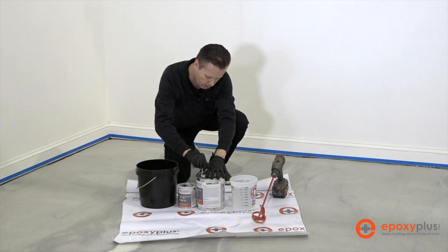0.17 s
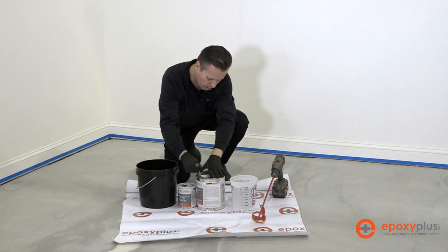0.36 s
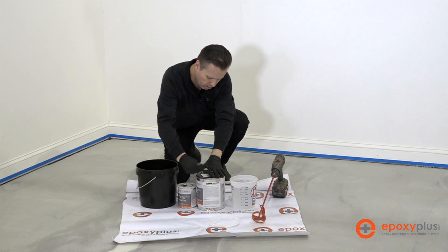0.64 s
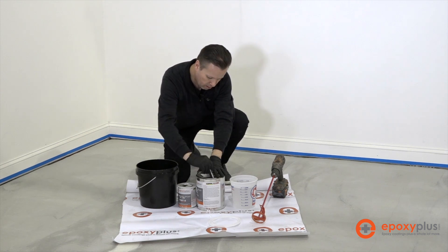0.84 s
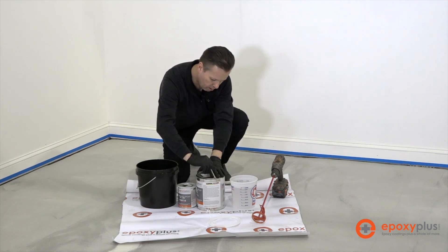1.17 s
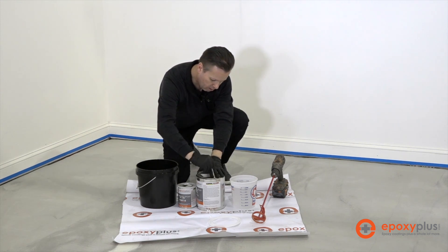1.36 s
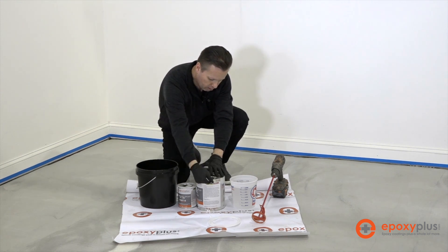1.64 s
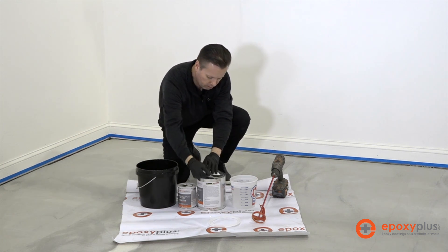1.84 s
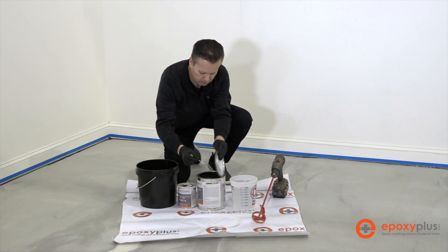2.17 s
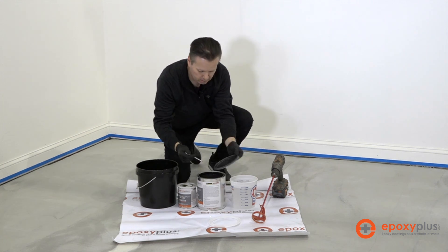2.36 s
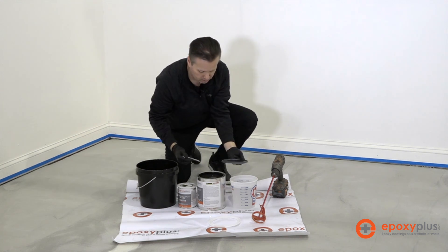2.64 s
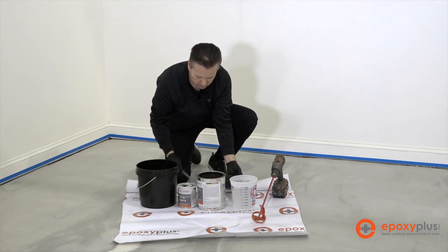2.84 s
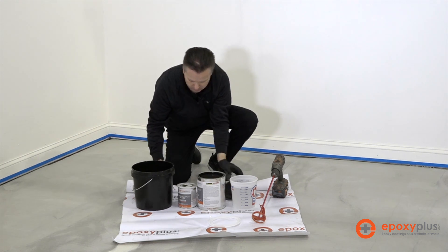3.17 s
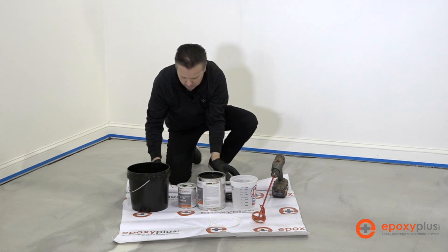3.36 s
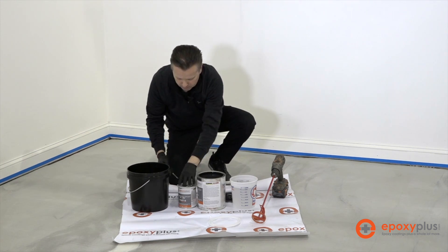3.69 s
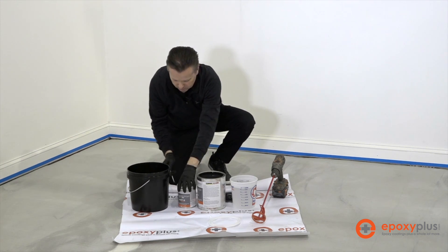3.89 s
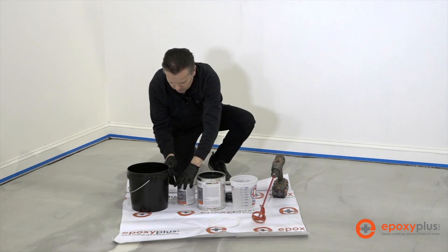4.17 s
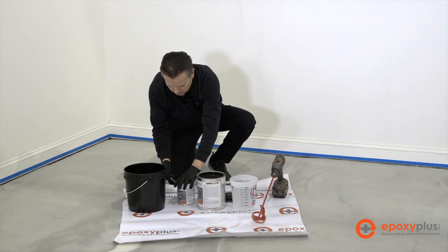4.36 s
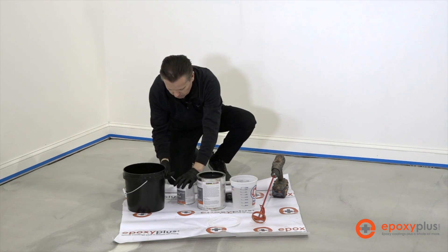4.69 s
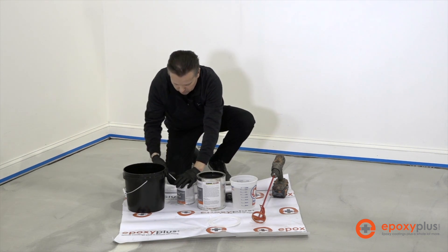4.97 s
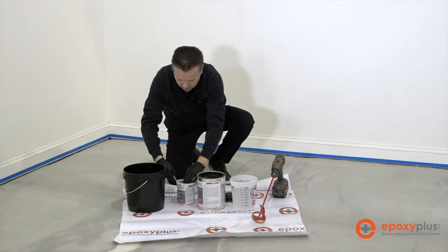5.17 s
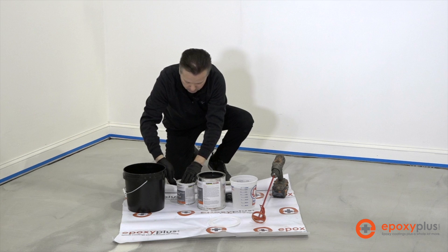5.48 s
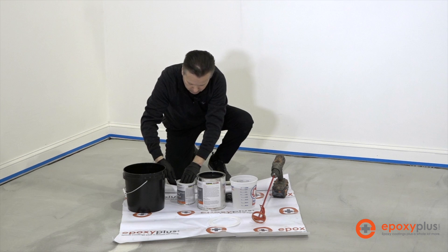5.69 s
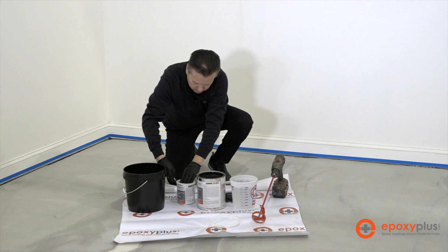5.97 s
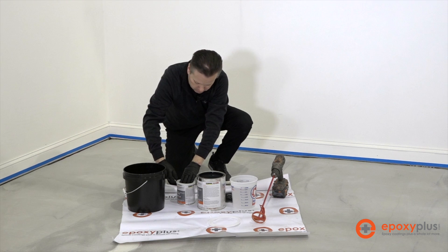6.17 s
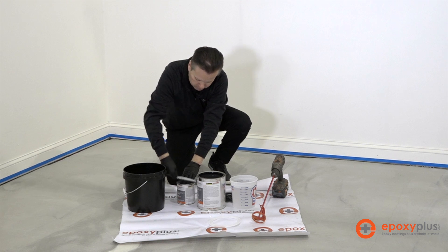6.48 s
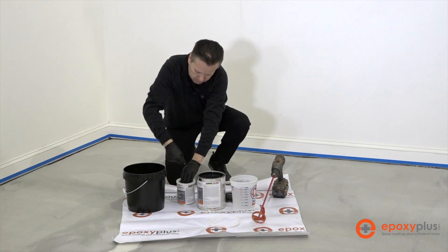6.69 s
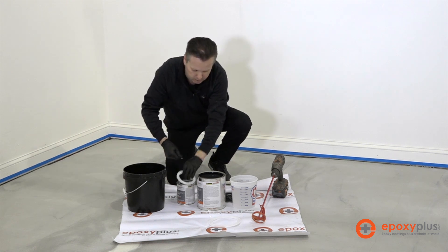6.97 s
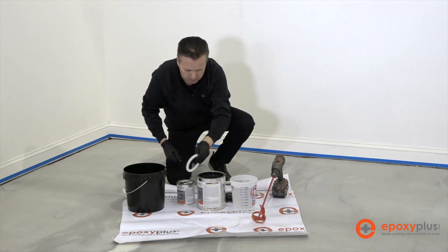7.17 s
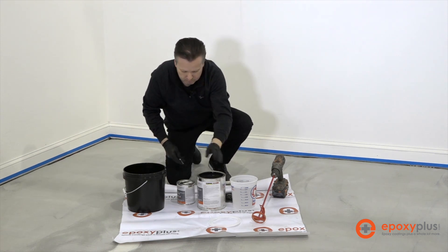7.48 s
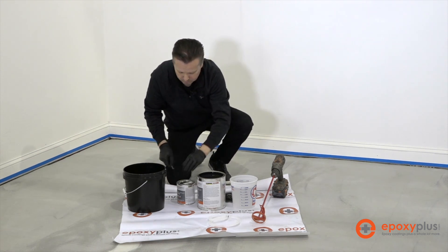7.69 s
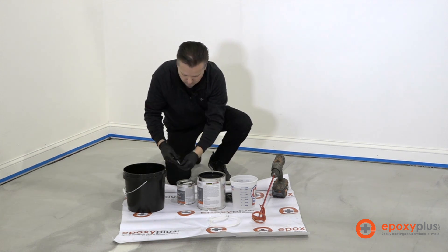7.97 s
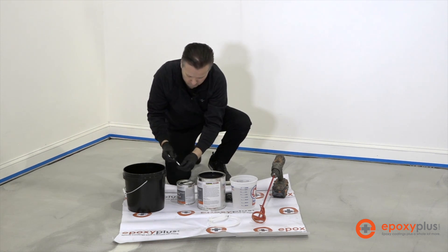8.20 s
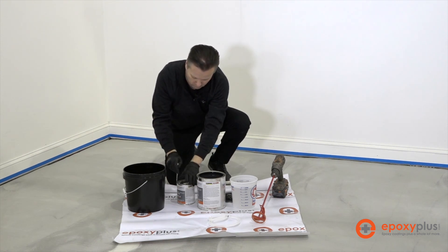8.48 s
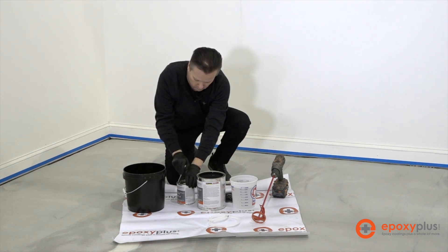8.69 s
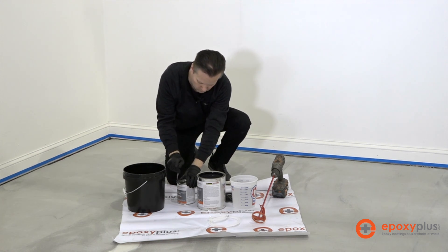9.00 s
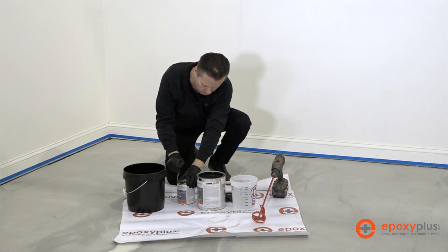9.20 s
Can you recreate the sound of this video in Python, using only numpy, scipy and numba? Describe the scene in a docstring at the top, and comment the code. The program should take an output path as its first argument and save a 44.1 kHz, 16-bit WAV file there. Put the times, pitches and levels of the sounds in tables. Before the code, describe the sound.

A tool clicks and drums on a large tin until its lid pops loudly, then quieter prying frees a small tin's lid among plastic rustles.

```python
"""In a quiet, faintly humming hard room, someone kneeling near a microphone levers at a large paint can.
The tool clicks on the rim and the can drums, each blow a burst of contact ringing tuned modes, while two echoes
and a diffuse tail answer. Cans and gloves rub on a plastic sheet in strokes of grainy noise, and gliding
resonances creak. The large lid pops and rings at 2 s; knocks and prying on a small can follow, whose lid pops
at 7.6 s. Small knocks and rubs follow to the end."""
import sys
import numpy as np
from scipy import signal
from scipy.fft import rfft, irfft, next_fast_len
from scipy.io import wavfile
from scipy.ndimage import uniform_filter1d
from numba import njit

SR = 44100
rng = np.random.default_rng(int(sys.argv[2]) if len(sys.argv) > 2 else 0)


def generate_wav(sig):
    """Save sig (samples, or channels by samples) to the path in sys.argv[1] as 16-bit PCM at SR."""
    pcm = np.round(np.clip(np.atleast_2d(sig).T, -1, 1) * 32767).astype(np.int16)
    wavfile.write(sys.argv[1], SR, pcm)


N = 411894


def undb(db):
    """Turn decibels into an amplitude factor."""
    return 10 ** (np.asarray(db) / 20)


def level(x, db):
    """Set the RMS level in dB."""
    return x * undb(db) / np.sqrt(np.mean(x ** 2))


def colour(x, points):
    """Shape the spectrum by (f/Hz, level/dB) points and bring the result to unit RMS."""
    size = next_fast_len(len(x))
    hz, db = np.transpose(points)
    bin_hz = np.arange(size // 2 + 1) * SR / size
    gain = undb(np.interp(np.log(bin_hz + 1), np.log(hz), db))
    return level(irfft(rfft(x, size) * gain, size)[:len(x)], 0)


def band(x, lo_hz, hi_hz):
    """Keep one frequency band, with gentle slopes."""
    return signal.sosfilt(signal.butter(2, [lo_hz, hi_hz], "band", fs=SR, output="sos"), x)


def walk(rate):
    """Random levels held 1 / rate s and slewed twice; spread near 1."""
    hold = int(SR / rate)
    steps = np.repeat(rng.standard_normal(N // hold + 1), hold)
    return 1.3 * uniform_filter1d(uniform_filter1d(steps, hold), hold)[:N]


@njit
def svf(x, hz, sharp):
    """State-variable band-pass with a moving centre; sharp is its Q."""
    y, b, l = np.empty(len(x)), 0., 0.  # output, band state, low state
    for i in range(len(x)):
        g = np.tan(np.pi * hz[i] / SR)
        v = (b + g * (x[i] - l)) / (1 + g * (g + 1 / sharp))
        b, l, y[i] = 2 * v - b, l + 2 * g * v, v / sharp
    return y


def even(x, shape):
    """Keep the timing of a burst but level its spectrum, so that no pitch is favoured."""
    spectrum = rfft(x * shape, 2 * len(x))
    flat = irfft(spectrum / (np.abs(spectrum) + 1e-12))[:len(x)]
    return flat * np.sqrt(shape)


def radiate(x, low_hz=190):
    """Cans and lids radiate deep bass only weakly."""
    return signal.sosfilt(signal.butter(1, low_hz, "high", fs=SR, output="sos"), x)


# Spectrum of the empty room and the microphone: (f/Hz, relative level/dB per Hz)
QUIET_SPECTRUM = [(12, -46.5), (20, 3), (64, -2.5), (113, 0), (326, -14.5), (449, -13.5), (920, -20.5),
                  (1840, -26.5), (2270, -24), (2460, -23.5), (3210, -25.5), (10300, -27.5), (11500, -31.5),
                  (15000, -73), (22000, -120)]
QUIET_DB = -61.5
HUM_HZ, HUM_DB = 118, -72  # a faint hum in the building


def quiet():
    """The steady hiss, low rumble and hum of the empty room and the microphone, wavering a little."""
    hum = band(rng.standard_normal(N), HUM_HZ - 7, HUM_HZ + 7) * undb(3 * walk(0.54))
    hiss = colour(rng.standard_normal(N), QUIET_SPECTRUM) * undb(.6 * walk(3))
    return level(hum, HUM_DB) + level(hiss, QUIET_DB)


# Edges of the drum, lower rim, upper rim and click bands: (f/Hz)
BAND_EDGES_HZ = (200, 1200, 3400, 6500, 11500)
# Crack against the ringing in the drum, lower rim and upper rim bands, before each source's crack_db: (level/dB)
BAND_CRACK_DB = (-1, 3, -1.5)
CRACK_T60_S, DRUM_T60_S = .04, 0.11  # both scaled by the ring factor of the blow
GRIP = 0.7  # the gloved hand shortens every mode by this factor
DRUM_SPREAD = 1.35  # the drum crack reaches this factor above and below the drum note


def contact_push(noise, chatter_ms):
    """The tip skips over the steel: a first knock and sparse random ones under a short bell-shaped swell."""
    touch = np.arange(SR // 20) / SR / (chatter_ms / 1000)
    skips = noise[0] * (noise[1] > 1.1)
    skips[0] = 2
    return even(skips, np.exp(-1.5 * (touch - .5) ** 2))


def blows(table, modes, crack_db, chatter_ms, scatter_db=3.5, detune=.01):
    """Each blow is a short chatter of contact that rings the drum note, the named modes and a dense crack."""
    out, t = np.zeros(N + SR), np.arange(SR // 2) / SR
    modes = np.array(modes)
    mode_hz, mode_db, mode_t60 = modes[:, :1], modes[:, 1:2], modes[:, 2:]
    group = np.searchsorted(BAND_EDGES_HZ, modes[:, 0])
    for start, click_db, drum_hz, drum_db, lower_db, upper_db, ring in table:
        noise = rng.standard_normal((2, SR // 20))
        push = contact_push(noise, chatter_ms)
        dying = -np.log(1000) * t / max(ring, .2)

        # the place of the blow shifts every mode a little
        spread = rng.standard_normal((2, len(modes), 1))
        mode_gain = undb(mode_db + scatter_db * spread[0]) * np.exp(dying / (GRIP * mode_t60))
        rings = mode_gain * np.sin(2 * np.pi * mode_hz * (1 + detune * spread[1]) * t)

        # an uneven lid splits its note in three
        skin_hz = drum_hz * np.array([[1], [.84], [1.17]]) * (1 + detune * noise[0, :3, None])
        skin = undb([0, -7, -7]) @ np.sin(2 * np.pi * skin_hz * t)
        drum = np.exp(dying / DRUM_T60_S) * (1 - np.exp(-t / .0015)) * skin

        low_rings, lower_rim, upper_rim = [rings[group == k].sum(0) for k in (1, 2, 3)]
        tones = [drum + low_rings, lower_rim, upper_rim, 0 * t]  # the click is crack alone
        crack_noise = even(rng.standard_normal(len(t)), np.exp(dying / CRACK_T60_S))
        lows = [drum_hz / DRUM_SPREAD, *BAND_EDGES_HZ[1:4]]
        highs = [drum_hz * DRUM_SPREAD, *BAND_EDGES_HZ[2:]]
        for k, peak_db in enumerate((drum_db, lower_db, upper_db, click_db)):
            crack = (-1) ** k * band(crack_noise, lows[k], highs[k])  # polarity alternates by band
            crack_gain = undb((*BAND_CRACK_DB, 0)[k] + crack_db)
            part = tones[k] + crack_gain * crack / np.abs(crack).max()
            # the slow drum feels one push, the higher bands the whole chatter
            sound = radiate(signal.fftconvolve(part, push if k else [1]))
            first = int(start * SR)
            out[first:first + len(sound)] += sound * undb(peak_db) / np.abs(sound).max()
    return out[:N]


# Blows on the large can: (t/s, click peak level/dB, drum note f/Hz, drum peak level/dB,
# lower rim peak level/dB, upper rim peak level/dB, ring length factor, at least 0.2 in use)
LARGE_CAN_BLOWS = [(0.0478, -24, 686, -33, -25.5, -22, 0.86), (0.2244, -28, 721, -19, -22.5, -17.5, 0.51),
                   (0.4314, -30, 704, -10.5, -24.5, -26, 0.3), (0.436, -64, 446, -16, -26, -35, 0.84),
                   (0.6903, -32, 708, -19, -28, -26.5, 0.94), (0.7208, -29, 707, -16, -22, -21, 0.68),
                   (0.7494, -53, 840, -31, -31, -58, 0.17), (0.8255, -48, 691, -21.5, -39, -43, 0.84),
                   (1.051, -37, 808, -35.5, -29.5, -32, 0.82), (1.074, -49, 678, -26.5, -27.5, -36, 0.41),
                   (1.284, -52, 928, -40, -39.5, -44, 1), (1.297, -41, 822, -28.5, -28, -34, 0.73),
                   (1.514, -45, 400, -19, -37.5, -40, 0.48), (1.516, -53, 730, -23, -44.5, -51, 1),
                   (1.7504, -44, 767, -31, -46.5, -40, 0.47), (1.7649, -40, 904, -31.5, -42.5, -68, 0.77)]
# Modes of the large can, its seated lid damped by rim and glove:
# (f/Hz, relative level/dB in its band, t60/s before grip and ring factor)
LARGE_CAN_MODES = [(350, -4.5, 0.031), (549, -26, 0.047), (900, -13, 0.13), (1130, -16.5, .04),
                   (1520, -8.5, 0.081), (2250, 1, 0.04), (2650, -8, 0.04), (2990, -2.5, 0.035),
                   (3130, -13, .04), (4179, -12, 0.027), (5140, -7, .012), (5738, -6, 0.011)]


def pry_large_can():
    """The tool slips and clicks on the large rim; the seated lid drums and dies quickly."""
    return blows(LARGE_CAN_BLOWS, LARGE_CAN_MODES, crack_db=-3.0, chatter_ms=4.8)


# Tail by octave: (centre f/Hz, t60/s, level/dB against the direct sound before the soft onset)
ROOM_OCTAVES = [(125, 0.17, -9.5), (270, 1, -11.5), (500, 1.0, -13), (1000, 0.7, -13), (2080, 0.51, -9),
                (4000, 0.53, -14), (7700, 0.45, -15.5)]
# Echoes off the floor and nearest wall: (delay t/s, level/dB against the direct sound)
ROOM_ECHOES = [(.006, -17), (0.022, -20.5)]


def room(x):
    """Two early echoes, with a diffuse tail whose octaves die at their own rates."""
    t = np.arange(int(1.2 * SR)) / SR
    tail = np.zeros(len(t))
    for hz, t60, db in ROOM_OCTAVES:
        octave = band(rng.standard_normal(len(t)), hz / 2 ** .5, hz * 2 ** .5)
        octave = level(octave * np.exp(-np.log(1000) * t / t60), db)
        tail += octave * np.sqrt(2 ** .5 * hz / SR / len(t))  # from RMS to gain within the octave
    tail *= 1 - np.exp(-t / .012)  # the tail builds up softly
    for delay, db in ROOM_ECHOES:
        tail[int(delay * SR)] += undb(db)
    return signal.fftconvolve(x, tail)[:N]


# Strokes on sheet, can and cloth: (start t/s, swell t/s, hold t/s, fade t/s, hiss level/dB, level/dB above 6 kHz
# against the hiss below it, rumble level/dB of the can against that hiss, rumble note f/Hz)
RUB_STROKES = [(0.165, 0.031, 0.0091, 0.019, -73.5, -6, 23.5, 680),
               (0.304, 0.026, 0.0071, .02, -68.5, 7, 21.5, 420),
               (0.613, 0.016, 0.028, 0.01, -49, -4.5, 9, 660), (0.775, 0.012, .015, 0.0088, -59, 4, 8, 666),
               (0.867, 0.0044, 0.0032, 0.023, -42, 4, -1, 585),
               (1.391, 0.032, .004, .02, -69.5, 0, 22, 614), (1.64, 0.14, 0.024, 0.036, -56, 0, 7, 900),
               (1.794, 0.033, 0.48, 0.026, -66.5, -2.5, 7, 935),
               (3.004, 0.03, .1, 0.079, -49, -14, 2.5, 790), (3.111, 0.091, 0.096, 0.1, -46, -7, 0.5, 525),
               (3.661, .03, 0.069, .04, -70, -10, -9, 500),
               (3.868, 0.089, 0.09, 0.12, -49.5, -4.5, 5.5, 360),
               (4.296, 0.025, 0.085, 0.078, -47, -14.5, 1.5, 710),
               (4.666, 0.035, 0.0069, 0.035, -59.5, -5, 3.5, 388),
               (5.102, 0.06, 0.083, 0.077, -65, -0.5, 4.5, 477),
               (5.381, 0.041, 0.055, 0.055, -71.5, 2.5, 2, 520),
               (5.719, 0.022, 0.055, 0.043, -74.5, 7.5, 13.5, 414),
               (5.942, .006, 0.0091, 0.073, -66.5, -2, 5, 290), (6.665, .02, 0.15, 0.04, -61, -11, 3, 350),
               (6.839, 0.022, 0.18, .02, -65.5, -9.5, 7.5, 477),
               (7.368, 0.066, 0.019, 0.018, -70, 2.5, -3, 380),
               (7.596, 0.022, 0.024, 0.3, -48.5, -2.5, -4, 1070),
               (8.055, .03, 0.0087, .03, -73.5, 8, -17, 443),
               (8.142, 0.037, 0.096, 0.033, -77, 7, -3.5, 427),
               (8.582, 0.0089, .005, .04, -73, -17, 8, 800),
               (8.753, 0.057, .02, 0.077, -65, -18.5, 8.5, 780),
               (8.984, 0.009, .008, .03, -67, -23, -4, 865)]
# Spectrum of the hissing sheet: (f/Hz, relative level/dB per Hz)
RUB_HISS_SPECTRUM = [(710, -18.5), (1200, 0.5), (1370, 0), (1690, -8.5), (3240, -3.5), (9520, -14.5),
                     (11200, -9), (11500, -31), (15000, -64), (22000, -120)]
# Spectrum of the rumbling can walls: (f/Hz, relative level/dB per Hz)
RUB_RUMBLE_SPECTRUM = [(59, -40), (100, 5), (236, 5), (323, -2.5), (432, -1), (754, 2.5), (1120, -5),
                       (1310, -40), (1800, -37.5), (2340, -32), (3960, -120)]
STROKE_EDGE_DB = -24.5  # pressure at the start and end of a stroke
NOTE_SHARE = 0.31  # share of the rumble in its note


def rubbing():
    """Dense stick-slip grains of uneven size; the sheet hisses and the can walls rumble."""
    t, out = np.arange(N) / SR, np.zeros(N)
    grains = rng.standard_normal((2, N)) * undb(2.5 * rng.exponential(size=(2, N)))
    hiss = colour(grains[0], RUB_HISS_SPECTRUM) * undb(1.5 * walk(120))
    dull = level(band(hiss, 900, 6000), 0)
    bright = level(band(hiss, 6000, 11500), 0)
    broad = colour(grains[1], RUB_RUMBLE_SPECTRUM) * undb(2.5 * walk(60))
    for start, swell, hold, fade, hiss_db, bright_db, rumble_db, note_hz in RUB_STROKES:
        corners = start + np.cumsum([0, swell, hold, fade])
        span = slice(int((corners[0] - .02) * SR), int((corners[-1] + .03) * SR))
        now = t[span]
        pressure_db = np.interp(now, corners, [STROKE_EDGE_DB, 0, 0, STROKE_EDGE_DB])
        touching = 1. * (now > corners[0]) * (now < corners[-1])
        contact = uniform_filter1d(touching, SR // 50)  # contact comes and goes softly
        note = level(svf(broad[span], note_hz + 0 * now, 6.0), 0)
        rumble = (1 - NOTE_SHARE) * broad[span] + NOTE_SHARE * note
        rub = dull[span] - undb(bright_db) * bright[span] + undb(rumble_db) * rumble
        out[span] += contact * undb(hiss_db + pressure_db) * rub
    return out


# Lid creaks and tool squeaks or pings on the rim: (start t/s, length t/s, from f/Hz, to f/Hz,
# level/dB over a third of a second, before the swell and fade)
CREAK_GLIDES = [(1.71, 0.033, 780, 950, -56), (1.805, 0.65, 893, 1000, -48),
                (4.728, 0.019, 3676, 3605, -54.5), (5.119, 0.22, 900, 800, -67),
                (5.347, 0.089, 1000, 1000, -69.5), (5.8, 0.039, 1060, 1073, -59),
                (5.933, 0.044, 2440, 2410, -58), (6.046, 0.01, 2366, 2273, -41),
                (8.582, 0.015, 2520, 2550, -47)]
CREAK_WIDTH_HZ, SLIP_SCATTER_DB = 200, 4.5  # width at the final pitch, per filter pass; unevenness of the slips


def creaks():
    """Uneven slips ring one resonance that may glide as the lid bends."""
    out = np.zeros(N)
    for start, length, from_hz, to_hz, db in CREAK_GLIDES:
        # 0-1 through the creak; a longer creak stops after a third of a second, part way through its glide
        x = np.arange(SR // 3) / SR / length
        progress = np.minimum(x, 1)
        slips = rng.standard_normal(len(x)) * undb(SLIP_SCATTER_DB * rng.exponential(size=len(x)))
        hz = from_hz + (to_hz - from_hz) * progress
        sharp = to_hz / CREAK_WIDTH_HZ
        tone = level(svf(svf(slips, hz, sharp), hz, sharp), db)
        swell = np.abs(np.sin(np.pi * progress)) ** .5
        first = int(start * SR)
        out[first:first + len(x)] += tone * swell
    return out


# Blows on the large lid: (t/s, click peak level/dB, drum note f/Hz, drum peak level/dB,
# lower rim peak level/dB, upper rim peak level/dB, ring length factor)
LARGE_LID_BLOWS = [(2.0178, -10, 975, -10.5, -1.5, -5, 0.44), (2.2166, -29, 1005, -21.5, -25, -19.5, 0.8),
                   (3.011, -37.5, 945, -20, -28, -30, 0.2), (3.014, -50.5, 464, -20.5, -30, -53.5, 0.87)]
# Modes of the free large lid: (f/Hz, relative level/dB in its band, t60/s before grip and ring factor)
LARGE_LID_MODES = [(360, -19, 1), (651, -20, .2), (470, -23.5, 0.2), (807, 0, 0.47), (941.7, -4, 0.35),
                   (2005, -0.5, .1), (2062, -5, 0.14), (2360, -8, 0.033), (2640, -19.5, 0.04),
                   (3150, -11.5, .05), (3802, 2.5, 0.03), (4280, -8, 0.05), (5220, -9.5, .04),
                   (5860, -2.5, .06)]


def pop_large_lid():
    """The freed large lid pops and rings, clearer than when seated."""
    return blows(LARGE_LID_BLOWS, LARGE_LID_MODES, crack_db=-4.5, chatter_ms=5.35)


# Prying and knocks of the small can: (t/s, click peak level/dB, drum note f/Hz, drum peak level/dB,
# lower rim peak level/dB, upper rim peak level/dB, ring length factor)
SMALL_CAN_BLOWS = [(3.2497, -37, 350, -31, -57.5, -27.5, 0.42), (3.3338, -42, 1000, -21, -27, -27.5, 0.47),
                   (3.9365, -46, 815, -52, -52, -35, 1.4), (4.1674, -55, 766, -43, -35.5, -52, 0.84),
                   (4.1785, -49, 277, -39.5, -47, -36.5, 0.8), (4.6493, -40, 270, -25, -27, -31.5, 0.56),
                   (4.9532, -45.5, 333, -52, -40, -43, 0.38), (5.0384, -47, 680, -54.5, -55, -49, 1.3),
                   (5.0556, -52, 690, -33.5, -37.5, -43, 0.43), (5.073, -60, 270, -37, -47, -55, 1.5),
                   (5.1981, -63, 827, -64, -55, -50, 1.5), (5.6068, -49.5, 838, -37.5, -31.5, -34.5, 0.47),
                   (5.7992, -59.5, 374, -47, -49.5, -49.5, 1.9),
                   (5.9377, -50, 264, -42, -49.5, -41.5, 0.53), (6.0263, -63, 1090, -46.5, -43, -61, 0.48),
                   (6.0493, -70.5, 930, -38, -39, -33.5, 0.58), (6.0979, -73, 529, -37.5, -59, -53, 0.75),
                   (6.4614, -44.5, 554, -33, -31.5, -35, 0.52), (6.4772, -38, 266, -26.5, -35, -45, 0.35),
                   (6.4924, -22, 271, -18, -23.5, -19, 0.6), (6.6507, -16, 520, -24.5, -18.5, -17, 0.76),
                   (6.6597, -32, 203, -27.5, -35, -49, 0.82), (6.785, -43, 690, -46, -39, -38.5, 0.9),
                   (6.84, -49, 320, -40, -39.5, -41, 0.51), (6.848, -43, 298, -49, -39, -48, 0.87),
                   (6.9015, -52, 360, -43, -49, -45, 0.31), (6.9236, -48, 534, -51, -64, -48, 0.49),
                   (6.9494, -53, 410, -47, -84, -43, 0.47), (7.046, -32, 762, -42.5, -34, -27, 0.62),
                   (7.9782, -62.5, 798, -47, -70.5, -52.5, 0.38), (8.4816, -50.5, 930, -24, -30, -41, 0.44),
                   (8.5617, -56.5, 762, -44, -56, -66.5, 0.89), (8.5818, -46, 810, -33.5, -35, -41, 0.59),
                   (8.73, -65, 710, -57.5, -57.5, -60.5, 0.8), (8.85, -56, 900, -53, -58, -55, 0.78),
                   (8.97, -52.5, 1099, -52, -50, -48, 1.6), (8.9956, -64.5, 985, -49, -45, -58.5, 0.84),
                   (9.1284, -73.5, 1013, -40, -44.5, -60, 0.41)]
# Modes of the small can, its seated lid damped by rim and glove:
# (f/Hz, relative level/dB in its band, t60/s before grip and ring factor)
SMALL_CAN_MODES = [(270, -0.5, 0.062), (587, 9, 0.04), (1010, -4, 0.074), (1457, -8, 0.036),
                   (2416, 5, 0.016), (2593, 4, 0.028), (3092, 9, 0.013), (3967, 1, 0.019),
                   (4510, -6, 0.01997), (5230, -1, 0.025)]


def knock_and_pry_small_can():
    """Prying at the small rim and small can knocks, with shorter contacts and more crack against the ring."""
    return blows(SMALL_CAN_BLOWS, SMALL_CAN_MODES, crack_db=5.0, chatter_ms=1.39)


# Blows on the small lid: (t/s, click peak level/dB, drum note f/Hz, drum peak level/dB,
# lower rim peak level/dB, upper rim peak level/dB, ring length factor)
SMALL_LID_BLOWS = [(7.586, -20.5, 1170, -47, -18, -22, 1.37), (7.5929, -41, 981, -13.5, -43, -36, 0.37),
                   (7.6075, -31, 990, -54, -50, -33, 1.3), (7.6769, -44, 1050, -38, -33.5, -36, 0.84),
                   (7.6874, -44, 1000, -45, -37, -45, 1)]
# Modes of the free small lid: (f/Hz, relative level/dB in its band, t60/s before grip and ring factor)
SMALL_LID_MODES = [(230, -11, 0.72), (400, -14.5, 0.65), (1010, 14.5, 0.063), (1457, 7.5, 0.053),
                   (2160, -19, 0.05), (2990, -7, 0.029), (4010, -8, 0.026), (5000, -12, 0.029),
                   (5400, -22, 0.054), (6200, -10, 0.074)]


def pop_small_lid():
    """The freed small lid pops and rings, clearer than when seated."""
    return blows(SMALL_LID_BLOWS, SMALL_LID_MODES, crack_db=2.5, chatter_ms=4.4)


LEFT_DB, SIDE_DB = .8, -26  # left over right in the shared sound; side signal against it


def scene():
    """Sum the work, the room's answer and the quiet, then spread them slightly over two channels."""
    large = pry_large_can() + pop_large_lid()
    small = knock_and_pry_small_can() + pop_small_lid()
    work = large + small + rubbing() + creaks()
    mid = work + room(work) + quiet()
    # the channels differ by a slight turn of phase
    side = undb(SIDE_DB) * np.imag(signal.hilbert(mid, next_fast_len(N))[:N])
    return np.array([undb(LEFT_DB / 2) * mid + side, undb(-LEFT_DB / 2) * mid - side])


TOP_HZ = 10950


def record(dry):
    """The recorder rounds the loudest peaks and cuts the top."""
    low_pass = signal.ellip(10, .2, 90, TOP_HZ, fs=SR, output="sos")
    return signal.sosfilt(low_pass, np.tanh(dry))


dry = scene()
out = record(dry)
generate_wav(out)
```